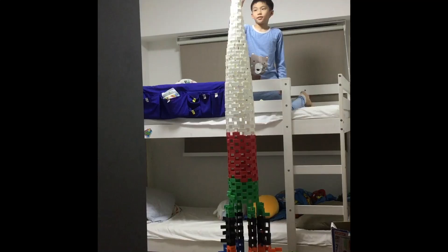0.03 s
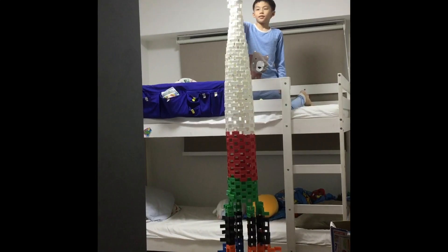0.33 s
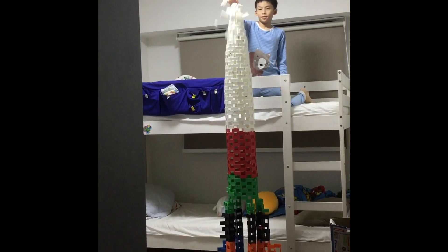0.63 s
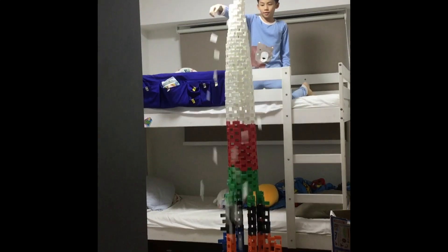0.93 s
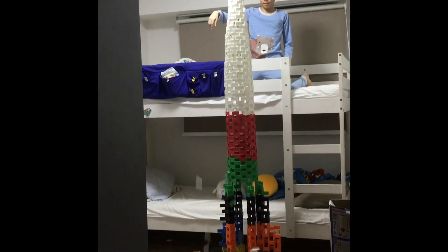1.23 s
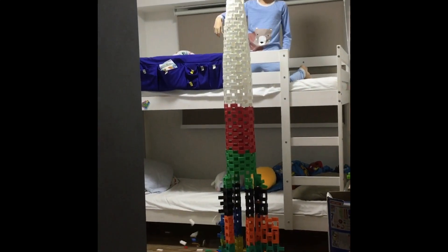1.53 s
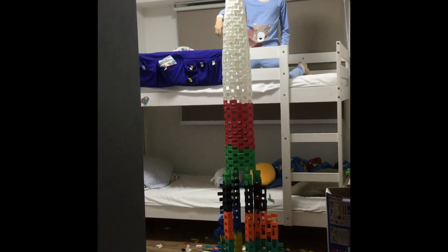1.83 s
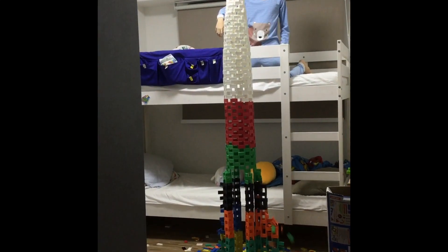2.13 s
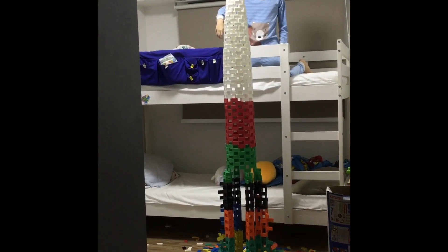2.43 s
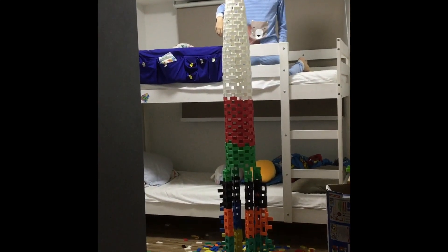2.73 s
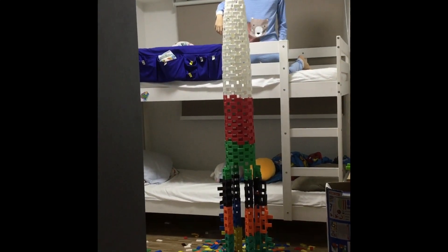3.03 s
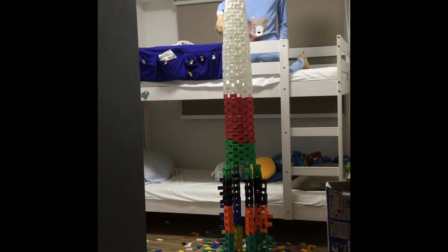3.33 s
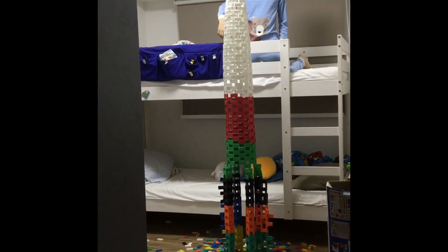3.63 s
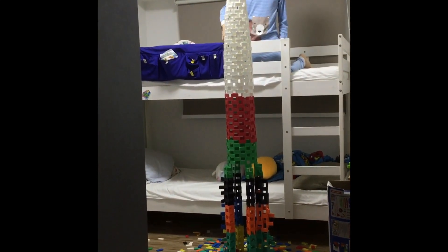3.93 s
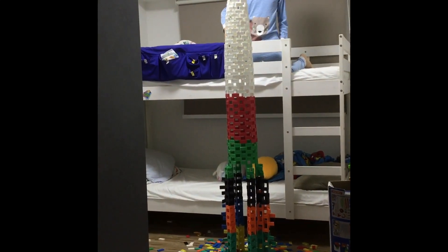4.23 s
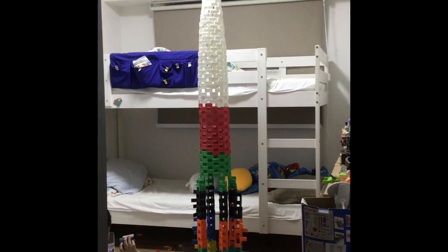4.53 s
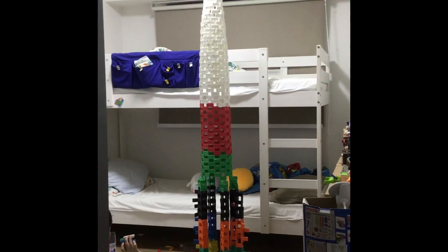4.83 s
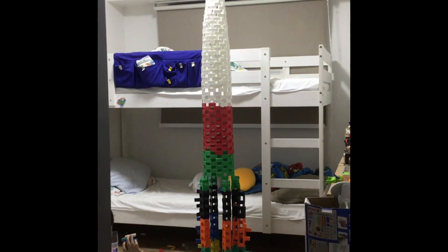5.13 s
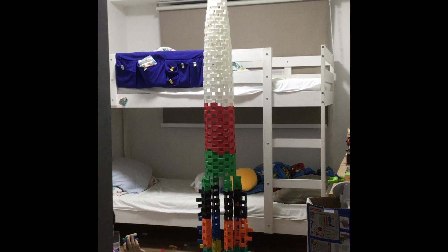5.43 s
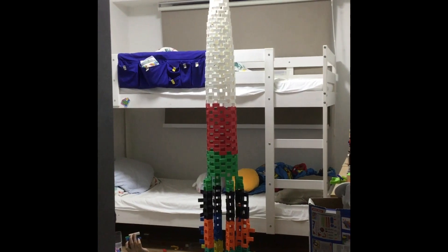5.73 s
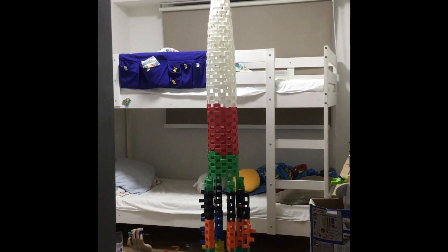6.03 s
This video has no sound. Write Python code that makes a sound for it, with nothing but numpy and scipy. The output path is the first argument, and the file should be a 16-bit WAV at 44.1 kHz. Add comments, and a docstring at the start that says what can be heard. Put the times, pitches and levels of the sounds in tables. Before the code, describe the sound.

Plastic tiles tick down a hollow toy tower, then shower onto a wooden floor in a loud, bouncing clatter that dies away.

```python
"""A small, lively bedroom with a wooden floor; a small microphone, far enough off to hear mostly room.
Over a low rumble, plastic tiles slide off a tall, hollow toy tower and shower onto the floor, with a
second batch a second later. Every collision is a clack, a hard edge, the ring of the tile and a knock
of the tower or the boards. Tiles bounce and scatter, heavy clumps thud, then one or two pieces settle."""
import sys
import numpy as np
from scipy import signal
from scipy.fft import rfft
from scipy.io import wavfile
from scipy.ndimage import uniform_filter1d

SR = 44100
rng = np.random.default_rng(int(sys.argv[2]) if len(sys.argv) > 2 else 0)


def generate_wav(sig):
    """Save sig (samples, or channels by samples) to the path in sys.argv[1] as 16-bit PCM at SR."""
    pcm = np.round(np.clip(np.atleast_2d(sig).T, -1, 1) * 32767).astype(np.int16)
    wavfile.write(sys.argv[1], SR, pcm)


N = 276948


def amp(db):
    """Decibels to gain."""
    return 10 ** (np.asarray(db) / 20)


def read_curve(points, hz):
    """A table read on a log-frequency axis."""
    table_hz, value = np.transpose(points)
    return np.interp(np.log(hz + 1), np.log(table_hz), value)


def colour(x, spectrum, size=8192):
    """Causal, minimum-phase filter with the given spectrum."""
    hz = abs(np.fft.fftfreq(size, 1 / SR))
    log_gain = np.log(amp(read_curve(spectrum, hz)))
    response = np.exp(np.conj(signal.hilbert(log_gain)))
    taps = np.fft.ifft(response).real[:size // 2]
    return signal.fftconvolve(x, taps)[:len(x)]


def unit_in_band(x, band_hz):
    """Scales a short sound to energy 1 inside a band."""
    hz = np.fft.rfftfreq(len(x), 1 / SR)
    inside = (hz > band_hz[0]) & (hz < band_hz[1])
    return x / np.sqrt(2 * np.sum(abs(rfft(x)[inside]) ** 2) / len(x))


def add(mix, s, sound):
    """Mixes a sound in at a time."""
    part = mix[max(round(s * SR), 0):][:len(sound)]
    part += sound[:len(part)]


def room_tone(start_s=0.069, fade_s=0.074, dip_at_s=4.435, dip_s=0.011, early_db=-63.5, late_db=-61.5):
    """A low steady rumble, which dips briefly and comes back deeper."""
    # the rumble before and after the dip: (frequency [Hz], relative density [dB])
    early_spectrum = [(15, -43.5), (25, -14), (86, 0.5), (213, -5), (363, -10.5), (475, -20), (655, -18.5),
                      (1350, -30.5), (2630, -30), (4500, -36), (7280, -43), (9270, -38), (15000, -51.5)]
    late_spectrum = [(15, -37), (25, 3), (54, -6.5), (118, -16), (154, -10.5), (181, -21.5), (335, -27.5),
                     (450, -33), (543, -35.5), (1150, -38.5), (1350, -36), (2370, -37), (15000, -63)]
    t = np.arange(N) / SR
    early = colour(rng.standard_normal(N), early_spectrum)
    late = colour(rng.standard_normal(N), late_spectrum)
    rumble = np.where(t < dip_at_s, amp(early_db) * early / early.std(), amp(late_db) * late / late.std())
    dip = np.clip(abs(t - dip_at_s) / dip_s - .6, .03, 1)
    fade_in = np.clip((t - start_s) / fade_s + .5, .01, 1)
    return rumble * dip * fade_in


def burst(spectrum, t60, size=4096):
    """A blow on a body with many crowded, quickly dying modes."""
    decay = amp(-60 * np.arange(size) / SR / t60)
    return colour(rng.standard_normal(size) * decay, spectrum)


def ringing(modes, pitch=1, size=4096):
    """The few clear modes of a struck thing, one row each."""
    t = np.arange(size) / SR
    hz, db, t60 = np.transpose(modes)[:, :, None]
    return amp(db - 60 * t / t60) * np.sin(2 * np.pi * hz * pitch * t)


def tile_ring(pitch, split_hz=6000):
    """One tile rings: its main ping and its overtones, each with energy 1."""
    # free modes of a tile: (frequency at pitch 1 [Hz], relative level [dB], t60 [s])
    modes = [(4300, 0, .08), (4660, -14, .04), (8200, -30, .05), (9700, -26, .07), (10700, -17, .06),
             (14950, -22, .03)]
    partials = ringing(modes, pitch)
    low = np.transpose(modes)[0] < split_hz
    return [part / np.linalg.norm(part) for part in (partials[low].sum(0), partials[~low].sum(0))]


def bedroom(direct_db, early_db=-11.5, early_s=.016, build_s=.006, echoes_per_s=5000):
    """From one spot to the microphone: direct sound, a few close walls, and a tail that dies by band."""
    # reverberation of the room: (frequency [Hz], t60 [s])
    decay_times = [(100, .5), (500, 0.43), (2500, 0.45), (4500, .45), (9000, 0.46), (15000, 0.37)]
    size = SR * 3 // 4
    echoes = rng.choice([-1., 1.], size) * (rng.random(size) < echoes_per_s / SR)
    hz, t, bands = signal.stft(echoes, SR, nperseg=256)
    decay = amp(-60 * t / read_curve(decay_times, hz)[:, None])
    tail = signal.istft(bands * decay, SR, nperseg=256)[1][:size]
    tail *= np.minimum(np.arange(size) / SR / build_s, 1)
    path = tail / np.linalg.norm(tail)
    walls = rng.random(size=8)  # 0 is near, 1 is far
    arrivals = ((.001 + walls * early_s) * SR).astype(int)
    path[arrivals] += amp(early_db) * (1 - walls / 2) * rng.choice([-1, 1], len(walls))
    path[0] += amp(direct_db)
    return path / np.linalg.norm(path)


def clatter(hits, clack_spectrum, body_spectrum, contact_t60, detune,
            ring_db, overtone_db, knock_db, edge_db, direct_db, spot_count):
    """Tiles collide at a few spots, each with its own colour and path through the room."""
    # the tiles ring a little higher as the fall goes on: (time [s], pitch [factor])
    pitch_rise = [(0.95, 1.005), (1.1, 1.018), (2.1, 1.02), (2.42, 1.042)]
    # the click of a hard edge: (frequency [Hz], relative density [dB])
    edge_spectrum = [(3500, -29), (6000, 0), (7400, -1.5), (8400, 3), (9300, -1), (10300, -4.5),
                     (11100, 0.5), (12000, -6), (14500, -9), (15600, -5)]
    out = np.zeros(N)
    spots = np.arange(len(hits)) % spot_count
    tunings = rng.triangular(-1, 0, 1, len(hits))
    pitches = np.linspace(.96, 1.08, 61)
    tiles = [tile_ring(pitch) for pitch in pitches]
    for spot in range(spot_count):
        clack = unit_in_band(burst(clack_spectrum, contact_t60), band_hz=(2000, 4000))
        edge = unit_in_band(burst(edge_spectrum, t60=0.016), band_hz=(7000, 15000))
        knock = unit_in_band(burst(body_spectrum, t60=0.047), band_hz=(300, 800))
        contacts = np.zeros(int(hits[:, 0].max() * SR) + len(clack))
        for (s, db, ring, body, hard), tuning in zip(hits[spots == spot], tunings[spots == spot]):
            pitch = np.interp(s, *np.transpose(pitch_rise)) + detune * tuning
            ping, overtones = tiles[np.argmin(abs(pitches - pitch))]
            # hard contact wakes the overtones
            bright = amp(hard) * (amp(edge_db) * edge + amp(overtone_db) * overtones)
            collision = clack + amp(ring + ring_db) * ping + bright + amp(body + knock_db) * knock
            add(contacts, s, amp(db) * collision)
        add(out, 0, signal.fftconvolve(contacts, bedroom(direct_db)))
    return out


def bounces(strikes, level_db, gap_s, loss_db, count=3):
    """Each strike is followed by weaker ones as the other corners of the tile come down."""
    hits = strikes.copy()
    hits[:, 1] += level_db
    out = [hits]
    for wait in rng.uniform(.3, 1.7, (len(hits), count)).T:
        hits = hits.copy()
        hits[:, 0] += gap_s * wait
        hits[:, 1] -= loss_db
        out.append(hits)
    return np.vstack(out)


def first_tiles(cascades, harder_db):
    """The first tile of each cascade hits harder than the stream behind it."""
    return [(s, db + harder_db, ring, knock, edge) for s, db, pour_s, ring, knock, edge in cascades]


def cascade(s, db, pour_s, ring, knock, edge, settle_s=.25, settle_db=29, soften_db=8):
    """Tiles pour at a steady strength, then die away, their contacts growing softer."""
    return [(s, db, ring, knock, edge),
            (s + pour_s, db, ring, knock, edge),
            (s + pour_s + settle_s, db - settle_db, ring, knock, edge - soften_db)]


def tumble(curve, per_s, spread_db, ring_spread_db, lead_s, level_db):
    """A stream of uneven collisions: (time [s], clack [dB], ring [dB], knock [dB], edge [dB])."""
    s, *levels = np.transpose(curve)
    delay, size, freedom = rng.random((400, 3)).T
    times = s[0] + (np.arange(len(delay)) + 2 * delay) / per_s
    power = amp(spread_db * (2 * size - 1)) ** 2
    power *= SR / per_s / uniform_filter1d(power, size=9)  # large and small share the falling energy
    hits = np.column_stack([times] + [np.interp(times + lead_s, s, level) for level in levels])
    hits[:, 1] += 10 * np.log10(power) + level_db
    ring = amp(ring_spread_db * (2 * freedom - 1)) ** 2  # a free tile rings, a trapped one hardly does
    hits[:, 2] += 10 * np.log10(ring / ring.mean())
    return hits[times < s[-1]]


def tower_top(cascades, strikes):
    """Tiles are nudged loose and slide over each other down the hollow tower."""
    # a tile's scrape and the tower's hollow knock: (frequency [Hz], relative density [dB])
    scrape_spectrum = [(150, -22.5), (600, -22), (1000, -20), (1500, -12), (2000, -5.5), (2600, 2.5),
                       (3300, 0.5), (3900, -3.5), (4700, -0.5), (5400, -9), (6500, -15.5), (8000, -27.5),
                       (16000, -49)]
    tower_spectrum = [(40, -25.5), (120, 1), (210, 7), (290, 11), (380, 3), (500, -5), (750, -5),
                      (1100, -15), (2000, -29), (6000, -60.5)]
    streams = [tumble(cascade(*row), per_s=140, spread_db=5.5, ring_spread_db=4.5,
                      lead_s=0.0099, level_db=-3.5) for row in cascades]
    strikes = np.vstack([strikes, first_tiles(cascades, harder_db=5.5)])
    hits = np.vstack(streams + [bounces(strikes, level_db=21, gap_s=0.01, loss_db=11.5)])
    return clatter(hits, scrape_spectrum, tower_spectrum, contact_t60=0.028, detune=0.024, ring_db=0,
                   overtone_db=-2, knock_db=-2.5, edge_db=-1, direct_db=-4.5, spot_count=12)


def floor_showers(cascades, strikes):
    """Tiles rain onto the boards and onto each other."""
    # a tile's clack and the floorboards' knock: (frequency [Hz], relative density [dB])
    clack_spectrum = [(150, -32.5), (500, -14), (1000, -11), (1600, -11.5), (2200, -4.5), (3200, 1.5),
                      (3650, -2.5), (4400, 0), (5200, -8), (6300, -9), (8000, -24.5), (16000, -39.5)]
    board_spectrum = [(40, -42), (100, -29), (150, -13.5), (240, -13), (330, -1.5), (430, 3), (580, 1.5),
                      (750, -2.5), (1000, -15), (2000, -30), (6000, -60)]
    streams = [tumble(cascade(*row), per_s=170, spread_db=9, ring_spread_db=5.5,
                      lead_s=.012, level_db=-1) for row in cascades]
    strikes = np.vstack([strikes, first_tiles(cascades, harder_db=9.5)])
    hits = np.vstack(streams + [bounces(strikes, level_db=19, gap_s=.011, loss_db=7)])
    return clatter(hits, clack_spectrum, board_spectrum, contact_t60=0.01, detune=.028, ring_db=-1.5,
                   overtone_db=-11, knock_db=0.09, edge_db=-0.28, direct_db=-5, spot_count=20)


def bending_wave(size, top_hz=300, end_hz=45, fall_s=.016, rise_s=0.0036, t60=0.073):
    """A thump travels along the boards; its high part arrives first, so the pitch drops."""
    t = np.arange(size) / SR
    hz = end_hz + (top_hz - end_hz) * np.exp(-t / fall_s)
    envelope = np.minimum(t / rise_s, 1) * amp(-60 * t / t60)
    return envelope * np.sin(2 * np.pi * np.cumsum(hz) / SR)


def thuds(thud_db=-11, boom_db=-3.5, wave_db=-1, t60=0.088, size=22050):
    """Whole clumps shake the floor and set the boards booming."""
    # clumps landing heavily: (time [s], level [dB])
    landings = [(1.059, -15.5), (1.071, -13.5), (1.097, -13), (1.211, -15), (1.239, -20), (1.446, -38),
                (1.488, -39), (2.342, -34)]
    # the dull blow of a clump: (frequency [Hz], relative density [dB])
    thud_spectrum = [(20, -39), (50, -12), (78, -1), (125, 3), (190, 0), (280, -4), (400, -14.5),
                     (1000, -43), (4000, -79.5)]
    # booming modes of the boards: (frequency [Hz], relative level [dB], t60 [s])
    board_modes = [(76, -8.5, 0.31), (131, -6.5, .22), (290.7, -9, 0.18), (418, -6.5, .5), (480, -7, .2),
                   (560, -16, .2)]
    out = np.zeros(N)
    boards = amp(boom_db) * ringing(board_modes, size=size).sum(0) + amp(wave_db) * bending_wave(size)
    for s, db in landings:
        thud = burst(thud_spectrum, t60, size)
        thud /= np.std(thud[:SR // 50])  # unit level over the first 20 ms
        add(out, s, amp(db) * (amp(thud_db) * thud + boards))
    return out


def scene(landing_s=0.95):
    """The slide at the top, then the showers and thuds on the floor, over the room tone."""
    # groups of tiles breaking loose or landing; ring, knock and edge are relative to the clack:
    # (time [s], clack [dB], pouring time [s], ring [dB], knock [dB], edge [dB])
    cascades = [(0.2554, -60.5, .02, -5.5, -7, -31), (0.3727, -54.5, 0.031, 2, -14, -28),
                (0.5074, -39.5, .08, 10, -26, -17), (0.6114, -47, 0.041, 7.5, -9, -1.5),
                (0.732, -49, .07, 7, -10.5, -14), (0.8264, -45.5, .03, 0.5, -16, -34),
                (1.0554, -18.5, .05, 0.5, -4, -2), (1.1794, -20, .17, 0, -6, -6.5),
                (1.4344, -20, 0.08, -1.5, -5.5, -7.5), (1.6753, -24, 0.076, -2, -7.5, -6.5),
                (1.835, -29.5, .08, 1, -4, -10.5), (1.9827, -26.5, .025, -3, -4.5, -9),
                (2.1054, -33.5, 0.069, 2, -5, -11.5), (2.2488, -24.5, .1, -7.5, -5, -10),
                (2.44, -28.5, 0.028, 4, -3.5, -11), (2.4739, -26.5, 0.19, 2.5, -7.5, -8),
                (2.7594, -31, 0.021, 4.5, -8.5, -8.5), (2.8854, -31, 0.039, -9.5, -12.5, -13.5),
                (2.9754, -38.5, 0.019, -3, -16, -8)]
    # single tiles that stand out: (time [s], clack [dB], ring [dB], knock [dB], edge [dB])
    strikes = [(0.1805, -66, -1, -4, -26), (0.206, -56, 0, -16, -29), (0.255, -57, -3, -10, -30),
               (0.4283, -45, 15, -5, 0), (0.475, -37.5, 12, -22, -21), (0.5373, -41, 22, -30, -16),
               (0.5585, -42.5, 17.5, -9, 4), (0.6324, -38, 13.5, -6, -9), (0.732, -41, 17.5, -10.5, -17),
               (0.7692, -34, 9, -9.5, -29), (0.9537, -33.5, -5.5, -2, -18), (0.9678, -23, 12.5, -10, -10),
               (1.0001, -31, 14.5, -14, -4.5), (1.0277, -6, 0.5, -17, -7.5), (1.0713, -8, -0.5, -6.5, -1),
               (1.0846, -13.5, 11, -4, -8.5), (1.0968, -9, 0.5, -8.5, -7), (1.3274, -13.5, -6, -4, -15.5),
               (1.4776, -13, -1, -8.5, -7.5), (1.6385, -17, 5.5, 0.5, -2), (2.3192, -17.5, 5.5, -12, -3.5),
               (2.342, -26, 14, -17, -2.5), (2.865, -16.5, -18, -7, -11.5), (3.5094, -64, -18, -5, 1),
               (3.9794, -70, -3, -2, -13)]
    aloft = [[row for row in table if row[0] < landing_s] for table in (cascades, strikes)]
    landed = [[row for row in table if row[0] >= landing_s] for table in (cascades, strikes)]
    return (tower_top(*aloft) + floor_showers(*landed) + thuds() + room_tone())[None]


def record(dry, low_cut_hz=40, high_cut_hz=15800, ceiling=1.5):
    """The small microphone loses the deepest bass and rounds off the loudest peaks; then a high cut."""
    thin = signal.sosfilt(signal.butter(2, low_cut_hz, "high", fs=SR, output="sos"), dry)
    rounded = ceiling * np.tanh(thin / ceiling)
    low_pass = signal.firwin(1023, high_cut_hz, window=("kaiser", 9), fs=SR)
    return signal.oaconvolve(rounded, low_pass[None], "same")


dry = scene()
out = record(dry)
generate_wav(out)
```